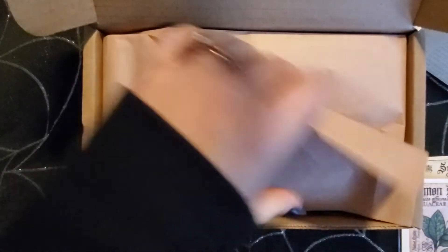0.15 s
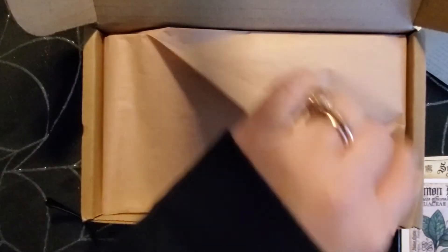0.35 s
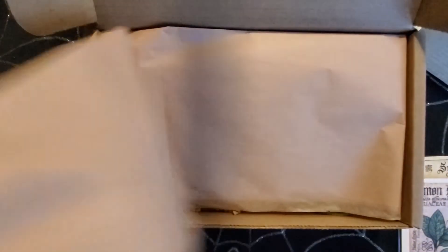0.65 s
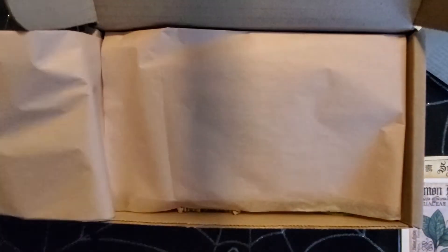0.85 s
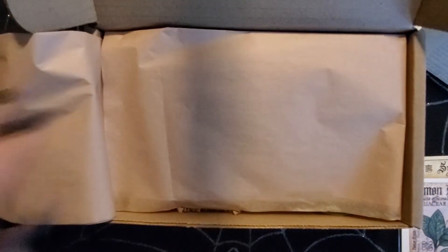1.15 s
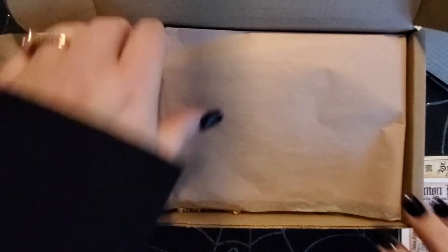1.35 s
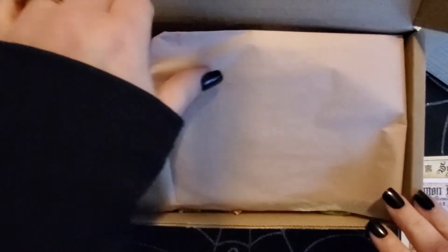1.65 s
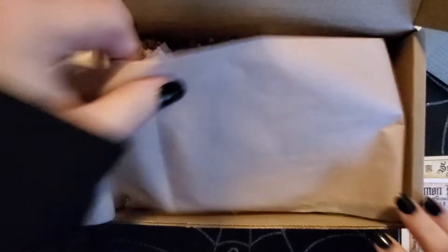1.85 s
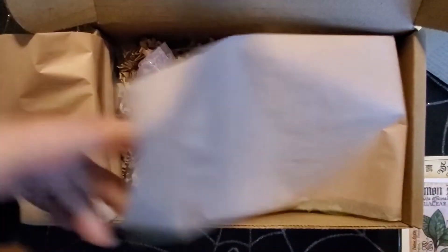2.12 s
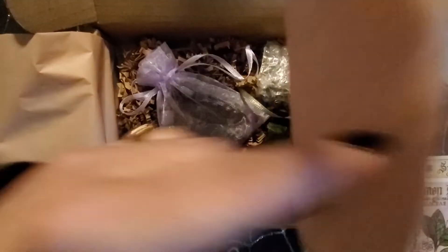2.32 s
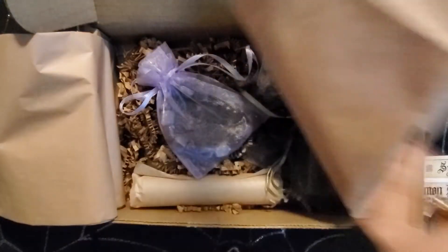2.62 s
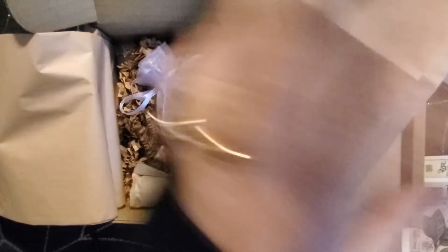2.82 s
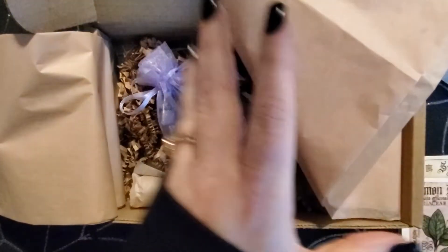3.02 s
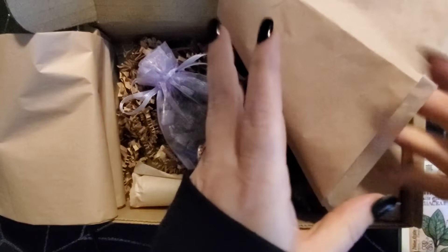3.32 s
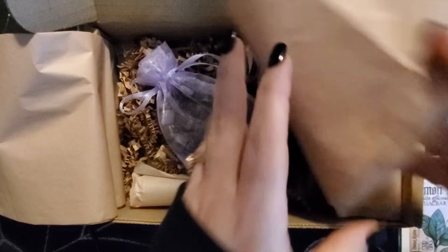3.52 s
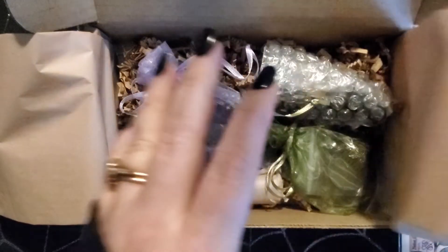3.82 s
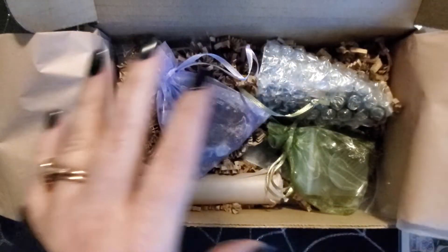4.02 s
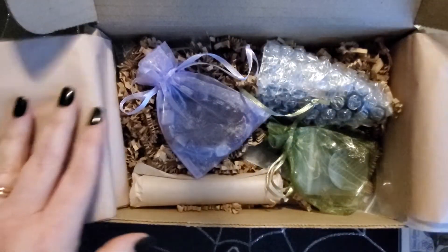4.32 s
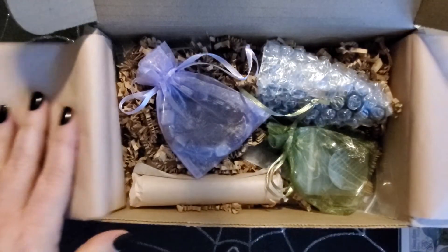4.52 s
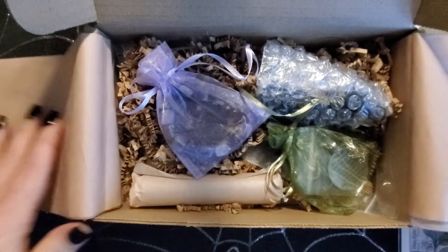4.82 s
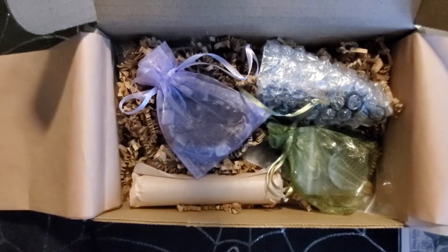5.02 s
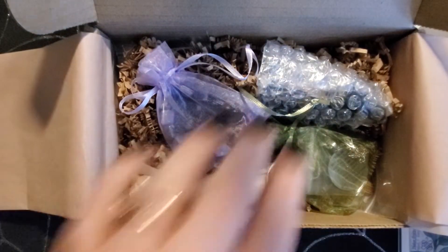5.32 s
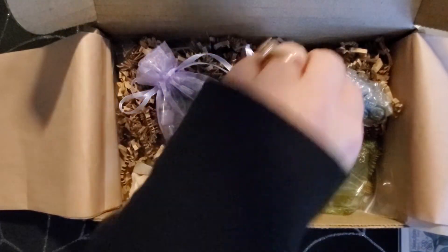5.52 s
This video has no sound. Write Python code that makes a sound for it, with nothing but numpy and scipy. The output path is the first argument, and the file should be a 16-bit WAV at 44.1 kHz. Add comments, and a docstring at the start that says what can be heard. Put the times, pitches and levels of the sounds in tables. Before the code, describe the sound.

Stiff wrapping paper rustles, crackles and snaps close up as hands fold it back, with dull bumps against a cardboard box.

```python
"""An open cardboard box on a table: hands fold back stiff wrapping paper under a two-port microphone.
Sliding sheets are noise in buckling bursts, taut patches sing through one resonance, creases snap in short clicks.
Rubbing and bumping fingers ring the box walls, the table drones, and puffs ring the air pocket under a sheet.
The microphone adds a faint steady hiss, plainest between the moves."""
import sys
import numpy as np
from scipy import signal
from scipy.fft import rfft, irfft, next_fast_len
from scipy.io import wavfile
from scipy.ndimage import uniform_filter1d

SR = 44100
rng = np.random.default_rng(int(sys.argv[2]) if len(sys.argv) > 2 else 0)


def transcribe(u):
    """Save the signal u as a 16-bit wav file named by the first command-line argument.

    u: samples, shape (n,) or (channels, n), limited to [-1, 1]; the rate is SR.
    q: integer samples, one column per channel.
    """
    v = np.clip(np.atleast_2d(u).T, -1, 1)
    q = np.round(v * 32767).astype(np.int16)
    wavfile.write(sys.argv[1], SR, q)


N = 249606  # length [samples]


def amp(db):
    """Gain of a level in dB."""
    return 10 ** (np.asarray(db) / 20)


def unit(x):
    """Scaled to rms 1."""
    return x / np.sqrt(np.mean(x ** 2) + 1e-20)


def along(points, hz):
    """Value at hz, drawn through (frequency, value) points on a log frequency axis."""
    f, v = np.transpose(points)
    return np.interp(np.log(hz + 1), np.log(f + 1), v)


def curves(rows):
    """One value per sample for each column after the time."""
    s, *cols = np.transpose(rows)
    return [np.interp(np.arange(N) / SR, s, c) for c in cols]


def filtered(x, response):
    """x passed through a complex response of frequency."""
    m = next_fast_len(x.shape[-1] + 8192)
    spectrum = rfft(x, m) * response(np.fft.rfftfreq(m, 1 / SR))
    return irfft(spectrum, m)[..., :x.shape[-1]]


def resonances(modes):
    """Causal response of (frequency [Hz], width [Hz], level [dB]) modes that alternate in sign."""
    def response(f):
        total = 0
        for k, (centre, width, db) in enumerate(modes):
            damping = 1j * f * width
            total = total + (-1) ** k * amp(db) * damping / (centre * centre - f * f + damping)
        return total
    return response


def sides(pan_db):
    """Gains of the left and right ports for a left-right balance."""
    return amp(np.outer([.5, -.5], pan_db))


def steadied(x, firm):
    """A narrow band whose wavering strength is partly evened out."""
    return unit(x / np.abs(signal.hilbert(x)).mean(axis=0) ** firm)


def swells(s, rise_s, hold_s, fall_s, levels_db):
    """Gain curves of overlapping swells whose powers add; one curve for each row of levels."""
    coarse = np.arange(0, N, 32)
    t = coarse / SR - np.reshape(s, (-1, 1))
    # rise and fall are seconds per 20 dB; their signs do not matter
    rise_s, hold_s, fall_s = (np.reshape(np.abs(v) + 1e-4, (-1, 1)) for v in (rise_s, hold_s, fall_s))
    shape_db = 20 * (np.minimum(t, 0) / rise_s - np.maximum(t - hold_s, 0) / fall_s)
    gains = np.sqrt(amp(np.atleast_2d(levels_db)) ** 2 @ amp(shape_db) ** 2)
    return [np.interp(np.arange(N), coarse, g) for g in gains]


# how much of the sound the two ports share: (frequency [Hz], likeness [0 to 1])
PORT_LIKENESS = [(60, 0.85), (130, 0.89), (300, 0.96), (700, 0.72), (1400, 0.56), (3000, 0.26),
                 (8000, 0.071)]


def port_noise(patchy_db, lag_ms=0):
    """White noise in random patches: a shared part, offset in time at the left port, the rest scattered."""
    z = signal.stft(rng.standard_normal((3, N)), nperseg=256)[2]
    field = uniform_filter1d(rng.standard_normal(z.shape[1:]), size=3, axis=0)
    field = uniform_filter1d(field, size=10, axis=1)
    shared, *own = signal.istft(z * amp(patchy_db * unit(field)), nperseg=256)[1][:, :N]
    late = np.clip(np.arange(N) - np.round(lag_ms * SR / 1000).astype(int), 0, N - 1)
    share = lambda hz: np.clip(along(PORT_LIKENESS, hz), 0, 1)
    both = filtered(np.array([shared[late], shared]), lambda hz: np.sqrt(share(hz)))
    return both + filtered(np.array(own), lambda hz: np.sqrt(1 - share(hz)))


# colour of the self-noise: (frequency [Hz], relative density [dB per Hz])
HISS_COLOUR = [(71, -33.5), (120, -7), (194, -7.5), (222, -16), (291, -10.5), (381, -18.5), (890, -21),
               (1240, -21.5), (5140, -33), (6600, -13.5), (12000, -37), (15600, -64.5)]
# the treble hiss sits in the left port: (frequency [Hz], left-right balance [dB])
HISS_BALANCE = [(4500, -0.5), (6000, 13)]


def hiss():
    """Steady self-noise of the two ports, independent in each."""
    colour = lambda hz: amp(along(HISS_COLOUR, hz)) * sides(along(HISS_BALANCE, hz))
    return amp(-74) * unit(filtered(rng.standard_normal((2, N)), colour))


# where the hands work, left or right of the microphone:
# (time [s], left-right balance [dB], lag of the left port [ms], negative when it leads)
HAND_PLACES = [(0, 0.5, 0.061), (.5, -0.5, .1), (.68, 4.5, -.3), (.85, 7, -.33), (1.5, 0, -0.17),
               (2, 3, -.1), (2.3, -2.5, 0.19), (2.8, -0.5, .09), (3.6, -2, .16), (4.3, -3, 0.3),
               (4.5, 3.5, -0.25), (4.65, -4, .36), (5.1, -7, 0.29), (5.66, 0.5, 0.02)]


def hand_place():
    """Balance [dB] and left-port lag [ms] at every sample as the hands wander."""
    return curves(HAND_PLACES)


# moves of the hands: (time at full level [s], rise [s per 20 dB], hold [s], fall [s per 20 dB], sheet level [dB],
# face, edge and belly against the sheet [dB each], level of the rubbed box walls [dB])
HAND_MOVES = [(0, .05, 0.008, 0.08, -53, -6.5, -2, -3.5, -64),
              (.13, 0.2, 0.3, 0.15, -82, -10.5, 17, -41, -105),
              (0.411, 0.077, 0.12, 0.35, -48.5, 0.5, -1.5, -3.5, -60.5),
              (.6, 0.081, 0.11, 0.092, -48, -0.5, -10.5, -1.5, -53),
              (0.78, 0.047, 0.039, 0.072, -36, 1.5, -6, -10, -41.5),
              (.95, 0.1, 0.0042, 0.05, -57, -4, -13, 5, -53),
              (1.075, 0.15, 0.0039, 0.052, -61.5, -7, -5, -9, -57.5),
              (1.163, 0.027, 0.0034, 0.084, -73, -15, 4, -3.5, -75),
              (1.398, 0.0043, 0.023, 0.035, -63, -1.5, -12, 14.5, -48.5),
              (1.425, 0.013, 0.0034, 0.044, -43, -8, -7.5, 0.5, -40),
              (1.47, 0.027, 0.045, 0.22, -59, 1, -12, 1.5, -50),
              (1.632, 0.093, 0.077, 0.078, -49.5, -1, 2.5, 1.5, -53),
              (1.8, 0.059, 0.12, 0.07, -51.5, 0.1, 1, -1, -58),
              (1.92, 0.1198, 0.015, 0.14, -48, -8.5, -3, -7, -60),
              (2.061, 0.18, 0.12, 0.077, -56, -8, 2, 1.5, -80),
              (2.139, 0.18, 0.089, 0.074, -50, -0.5, 2.5, -7.5, -86),
              (2.381, 0.073, 0.0754, 0.16, -55.5, 0, -5, -10, -67),
              (2.5, 0.087, 0.16, 0.045, -62.5, 3.5, -8.5, -4, -78),
              (2.699, 0.038, 0.0038, 0.029, -48.5, 5, -4.5, 3, -65),
              (2.749, 0.074, 0.0031, 0.087, -53.5, -4.5, -3.5, -2.5, -58),
              (2.88, 0.025, 0.0035, 0.078, -59, -4.5, 1, -12, -69),
              (3.517, 0.085, 0.013, 0.037, -56, 4, -5.5, -2.5, -56),
              (3.6, 0.12, 0.053, 0.091, -57.5, 6.5, -9.5, -1, -62.5),
              (3.734, 0.12, 0.1, 0.18, -54, 0.5, -2, -10.5, -76),
              (3.892, 0.19, 0.44, 0.25, -45, -2.5, -1.5, -3.5, -49),
              (4.12, 0.15, 0.16, 0.18, -49.5, -0.5, -9, -4, -49),
              (4.324, 0.0096, 0.006, 0.021, -34, -12, -4, 3.5, -37),
              (4.349, .05, 0.021, 0.12, -46, -3, -3.5, -1, -50.5),
              (4.473, 0.07, 0.077, 0.29, -45, -3.5, -4, -9, -60.5),
              (4.799, 0.95, 0.11, 0.186, -64, 0.5, 0, -32.5, -94),
              (5.0, 0.16, 0.11, 0.12, -72, 0.5, 1.5, -39, -92),
              (5.574, 0.023, 0.042, 0.12, -53.5, 0.5, 0.5, -5, -75)]


def moves():
    """Gains of sheet, face, edge, belly and walls under the hands."""
    s, rise_s, hold_s, fall_s, level_db, *parts_db, wall_db = np.transpose(HAND_MOVES)
    levels_db = [level_db, *(level_db + parts_db), wall_db]
    return swells(s, rise_s, hold_s, fall_s, levels_db)


def crackle(rate, spread_db, t60, smooth):
    """Envelope of small buckles: random moments, a few much stronger, quick rise and fall, over steady rubbing."""
    chance, size = rng.random((2, N))
    kicks = (chance < rate / SR) * amp(-spread_db * np.log(size + 1 / 40))  # rate per second
    t = np.arange(SR // 20) / SR
    shape = amp(-60 * t / t60) * (1 - np.exp(-t / 0.00016))
    bursts = np.abs(signal.fftconvolve(kicks ** 2, shape ** 2)[:N])
    power = smooth + bursts / bursts.mean()
    # the hands set the slow level, so the buckles only redistribute it
    return np.sqrt(power / uniform_filter1d(power, size=SR // 8))


# the left port is duller: (frequency [Hz], left-right balance [dB])
PORT_SHADE = [(5000, -0.5), (7500, -3.5), (15000, -5)]
# colours of the parts of a sheet: each (frequency [Hz], relative density [dB per Hz])
SHEET_COLOUR = [(2000, -34.5), (3000, -5.5), (4500, -5), (6000, -12), (8000, -37.5)]
FACE_COLOUR = [(900, -14), (1400, -6), (2500, -4), (3500, -21.5)]
EDGE_COLOUR = [(2800, -22), (4500, -10.5), (6500, -3), (9000, -2), (12000, -9.5), (15500, -5)]
BELLY_COLOUR = [(250, -26), (450, 4), (800, 6.5), (1300, -1.5), (2000, -22)]


def paper():
    """Sliding sheets: the same buckles shake every part of the sheet, the edges tick on top."""
    sheet, face, edge, belly, _ = moves()
    pan_db, lag_ms = hand_place()
    air = port_noise(patchy_db=2, lag_ms=lag_ms)
    buckles = crackle(rate=550, spread_db=3.0, t60=0.055, smooth=0.54)
    # fibres let go in tiny ticks, at other moments on the face than along the edges
    ticks = crackle(rate=260, spread_db=3.6, t60=.009, smooth=.7)
    specks = crackle(rate=500, spread_db=2.0, t60=.01, smooth=.9)

    def layer(colour, envelope):
        response = lambda hz: amp(along(colour, hz)) * sides(along(PORT_SHADE, hz))
        return unit(envelope * filtered(air, response))

    bright = sheet * layer(SHEET_COLOUR, buckles * specks) + edge * layer(EDGE_COLOUR, buckles * ticks)
    broad = face * layer(FACE_COLOUR, buckles * specks) + belly * layer(BELLY_COLOUR, buckles)
    return sides(pan_db) * bright + broad  # only the bright parts follow the hands from side to side


# fingers bumping the box: (time [s], blow [dB], hardness as pulse corner [Hz],
# shudder of the walls [dB], shudder of the table [dB])
FINGER_BUMPS = [(0.765, 18, 800, -39, -48.5), (0.788, 14, 600, -42, -44.5), (0.831, 11, 790, -42, -58),
                (1.064, -7.5, 400, -66.5, -74), (1.421, 21.5, 1500, -33.5, -70),
                (1.435, 25, 350, -44, -63.5), (1.511, 18, 300, -45, -46), (1.525, 15.5, 298, -44.5, -50),
                (1.633, 8.5, 503, -60, -50), (2.095, 11, 249, -50, -54), (2.691, -3.5, 900, -60.5, -70),
                (4.319, 7, 800, -51.5, -43), (4.333, 22, 110, -54, -60)]


def shudder(timing, levels_db):
    """Gain of a body that shakes for a moment after each bump."""
    lag_s, *shape_s = timing
    return swells(np.transpose(FINGER_BUMPS)[0] + lag_s, *shape_s, levels_db)[0]


# low drone of the table top: (time [s], level [dB])
TABLE_DRONE = [(0, -68), (.12, -65), (.32, -75.5), (.42, -56.5), (.74, -58), (.97, -74.5), (1.38, -81),
               (1.6, -71), (2.21, -57), (2.32, -64), (2.64, -71), (2.79, -57), (3.3, -68), (3.47, -78),
               (3.71, -63.5), (3.83, -54), (4.52, -59), (4.73, -71), (4.95, -59.5), (5.3, -76),
               (5.66, -62.5)]
# the table's mode: (frequency [Hz], width [Hz], level [dB])
TABLE_MODES = [(66, 28, 0)]


def table(air):
    """The table top drones in a narrow low band and shudders after bumps, a touch louder on the right."""
    timing = (0.0077, 0.082, 0.029, 0.068)  # lag [s], rise [s per 20 dB], hold [s], fall [s per 20 dB]
    gain = np.hypot(amp(*curves(TABLE_DRONE)), shudder(timing, np.transpose(FINGER_BUMPS)[4]))
    top = lambda hz: resonances(TABLE_MODES)(hz) * resonances([(70, 70, 0)])(hz)
    return gain * steadied(filtered(air, top), firm=.6) * sides([-0.5])


# modes of the cardboard walls: (frequency [Hz], width [Hz], level [dB])
WALL_MODES = [(99, 26, -0.5), (207.7, 50, -2), (263.3, 38, 1.5), (300.4, 27, 1.5), (486, 130, -8),
              (682, 100, -7.5), (763, 17, -11.5)]


def walls(air):
    """Rubbing and the shudder after bumps drive the modes of the cardboard walls."""
    timing = (0.013, 0.013, 0.0046, 0.073)  # lag [s], rise [s per 20 dB], hold [s], fall [s per 20 dB]
    gain = np.hypot(moves()[-1], shudder(timing, np.transpose(FINGER_BUMPS)[3]))
    return gain * unit(filtered(air, resonances(WALL_MODES)))


def blows():
    """A fingertip presses and lets go: a soft pulse with little treble rings the wall modes."""
    pulses, t = np.zeros(N + SR), np.arange(SR // 50) / SR
    for s, db, hard_hz, *_ in FINGER_BUMPS:
        corner = 2 * np.pi * hard_hz
        pulses[round(s * SR):][:len(t)] += amp(db) * corner ** 2 / SR * t * np.exp(-corner * t)
    return filtered(pulses[:N], resonances(WALL_MODES)) * sides([1.5])


def box():
    """Box walls and the table under them, shaken by the same noise, plus the blows of the fingers."""
    air = port_noise(patchy_db=1)
    return table(air) + walls(air) + blows()


# taut patches of sheet that sing in one colour under a finger: (time at full level [s], rise [s per 20 dB],
# hold [s], fall [s per 20 dB], level [dB], pitch [Hz]); signs of rise and fall are ignored
PATCH_SWISHES = [(0.124, 3, 0.23, -2.5, -67.5, 4300), (2.405, -0.1, 0.082, 0.35, -57.5, 1150),
                 (2.1, 0.44, 0.044, 0.2, -51, 4300), (5.041, 1.44, 0.097, 0.1, -67.5, 1900)]


def swishes():
    """Rubbing noise through the resonance of one stretched patch."""
    out, (pan_db, lag_ms) = np.zeros((2, N)), hand_place()
    for *timing, level_db, hz in PATCH_SWISHES:
        patch = resonances([(hz, .6 * hz, 0)])
        air = port_noise(patchy_db=-0.5, lag_ms=lag_ms)
        rubbed = unit(filtered(air, lambda f: patch(f) ** 2))
        out += swells(*timing, [level_db])[0] * rubbed
    return sides(pan_db) * out


# creases that snap: (time [s], level [dB], pitch [Hz], treble against the pitch [dB],
# length [ms], played as 3 ms where shorter)
CREASE_SNAPS = [(.0054, -26, 3290, -16, 3), (0.392, -29.5, 4000, -16.5, 11.5),
                (0.4381, -16.5, 928, -24, 19), (0.4406, -20, 4226, -30, 20),
                (0.4976, -14.5, 2100, -14, 14.5), (0.7045, -26, 3020, -22, 4.5),
                (0.762, -25.5, 4196, -9, 12.5), (0.7974, -11.5, 3465, -27.5, 4),
                (0.821, -16, 2573, -23.5, 22.5), (0.928, -37, 1284, -16, 21), (0.9999, -44, 3580, -4, 11),
                (1.11, -48, 3200, -26, 9.5), (1.157, -39, 764, 1.5, 3.5), (1.3964, -33, 1000, -23, 26),
                (1.4247, -28.5, 1057, -14.5, 22.5), (1.627, -30, 7200, -8.5, 13),
                (1.634, -27, 1130, -14, 20.5), (1.704, -22.5, 4460, -23, 12), (2.133, -20, 2782, -22, 16),
                (2.1467, -26.5, 3220, -3, 20), (2.1833, -29.5, 3714, -3.5, 28.5),
                (2.307, -37, 3630, -15, 10.5), (2.3428, -38.5, 3360, -3, 16.5),
                (2.371, -32.5, 2190, -6, 34), (2.4164, -31, 1001, -5.5, 13), (2.4405, -30, 3524, -7, 30),
                (2.6773, -16, 578, -22, 20.5), (2.6943, -16, 540, -30.5, 16),
                (2.7372, -21, 3330, -16.5, 10), (2.7445, -22.5, 3770, -12, 10.5),
                (2.8397, -38, 3290, -7.5, 14), (2.875, -29.5, 3383, -4, 21.5),
                (3.5189, -39.5, 1154, 0.5, 5), (3.5261, -31.5, 1632, -20, 18.5),
                (3.5591, -25.5, 1280, -14, 26), (3.594, -30.5, 1890, -12, 6), (3.621, -34.5, 2990, -7, 3.5),
                (3.6359, -15, 1330, -19, 12.5), (3.659, -20, 3296, -9.5, 10),
                (3.716, -41.5, 3626, -4, 11.5), (3.8557, -27.5, 4540, -6, 16.5), (3.888, -26.5, 5070, 0, 8),
                (3.8979, -23, 3850, -11, 16), (3.904, -24, 3890, -5, 9.5), (3.975, -28, 5945, -1.5, 12.5),
                (4.019, -27.5, 4080, -3.5, 9), (4.0555, -24, 3956, -7.5, 18),
                (4.1073, -24, 4990, -5.5, 4.5), (4.156, -23.5, 4670, 0.5, 20), (4.2124, -21, 1057, -6, 5.5),
                (4.2923, -31, 960, -4.5, 12.5), (4.3233, -21, 3800, -30, 6.5),
                (4.382, -28.5, 5330, -15, 17.5), (4.4245, -22.5, 990, -10.5, 40),
                (4.8988, -39, 2870, -9.5, 0), (5.012, -44, 4590, -2, 11.5), (5.5566, -39.5, 2720, -5, 27)]


def creases():
    """Each crease gives a burst of a few milliseconds, coloured by the size of the facet that flips."""
    out, t = np.zeros((2, N + SR)), np.arange(SR // 10) / SR
    pan_db, lag_ms = hand_place()
    air, place = port_noise(patchy_db=4.0, lag_ms=lag_ms), sides(pan_db)
    for s, db, hz, treble_db, length_ms in CREASE_SNAPS:
        at = round(s * SR)
        age = t * 1000 / max(length_ms, 3)
        # the flip swells for about an eighth of its length, then dies
        swell = age * amp(-70 * age + 18)
        push = swell * air[:, at:at + len(t)]
        # at the top of the swell the facet flips with one sharp click, first heard at the nearer port
        delays = np.maximum(np.round(lag_ms[at] * SR / 1000 * np.array([1, -1])), 0).astype(int)
        push[[0, 1], swell.argmax() + delays] -= amp(13)
        modes = resonances([(hz, 0.64 * hz, 0), (11000, 9000, treble_db)])
        facet = lambda f: modes(f) * sides(along(PORT_SHADE, f))
        out[:, at:at + len(t)] += amp(db) * place[:, [at]] * filtered(push, facet)
    return out[:, :N]


# a sheet flops or is pressed over the box edge and puffs ring the air pocket under it: (time [s], level [dB])
AIR_PUFFS = [(0.775, -40), (.825, -38), (1.079, -62.5), (1.452, -53.5), (4.332, -46)]


def pocket():
    """Puffs of air excite the one mode of the hollow under the folded sheet."""
    s, level_db = np.transpose(AIR_PUFFS)
    rise_s, hold_s, fall_s = 0.027, 0.021, 0.04  # rise and fall per 20 dB
    gain, = swells(s, rise_s, hold_s, fall_s, level_db)
    hollow = resonances([(820.0, 80, 0)])
    ringing = filtered(port_noise(patchy_db=0), lambda hz: hollow(hz) ** 2)
    return gain * steadied(ringing, firm=.8)


def scene():
    """Everything at the two ports."""
    return hiss() + paper() + box() + swishes() + creases() + pocket()


def record(dry):
    """The microphone loses the deepest bass; nothing is kept above the band limit."""
    bass_hz, top_hz = 45, 15800
    return filtered(dry, lambda hz: (hz < top_hz) * 1j * hz / (bass_hz + 1j * hz))


dry = scene()
out = record(dry)
transcribe(out)
```